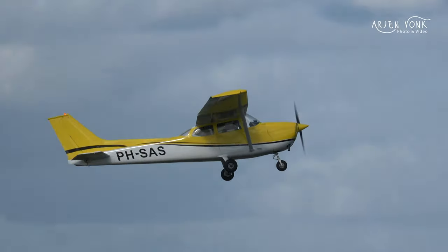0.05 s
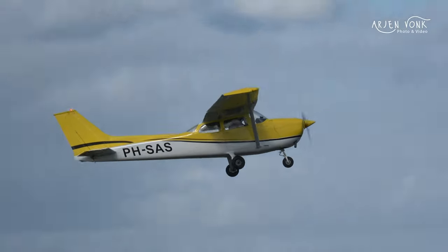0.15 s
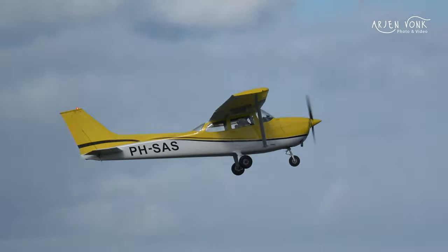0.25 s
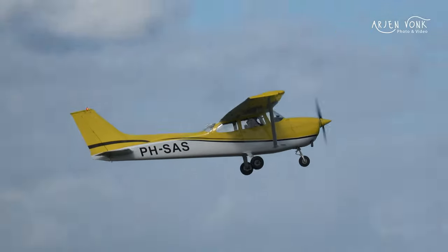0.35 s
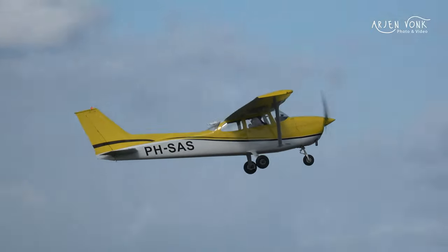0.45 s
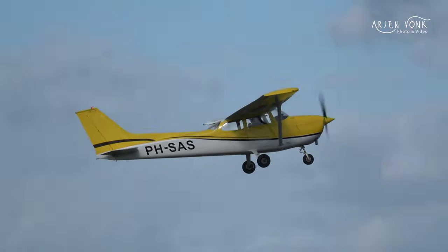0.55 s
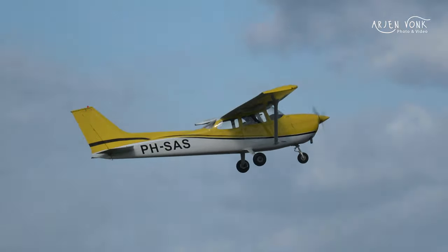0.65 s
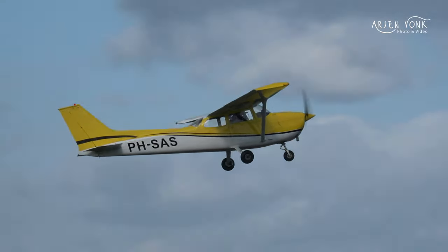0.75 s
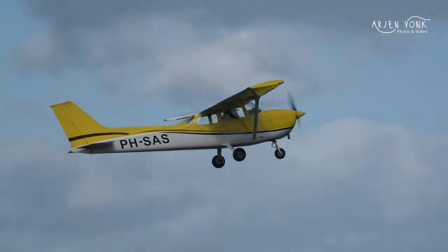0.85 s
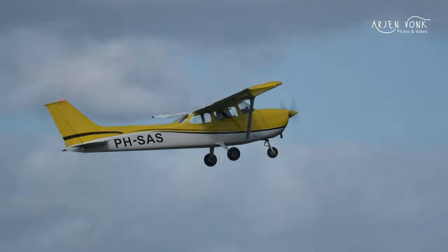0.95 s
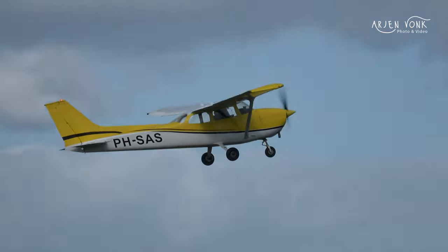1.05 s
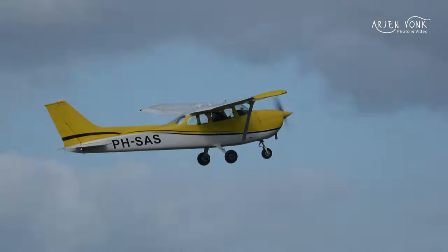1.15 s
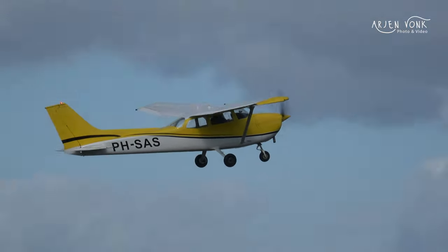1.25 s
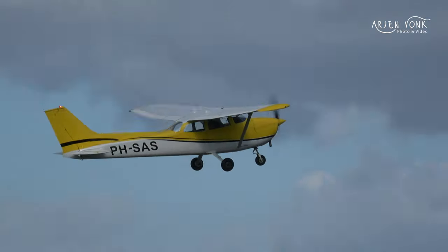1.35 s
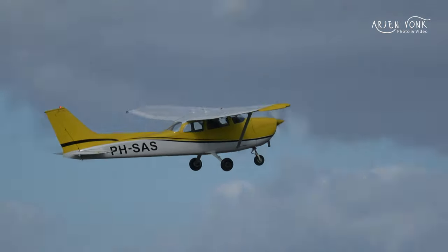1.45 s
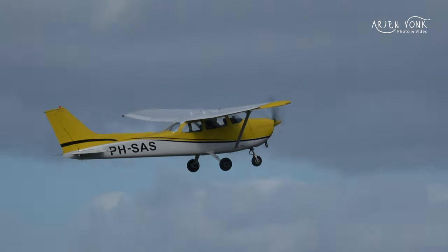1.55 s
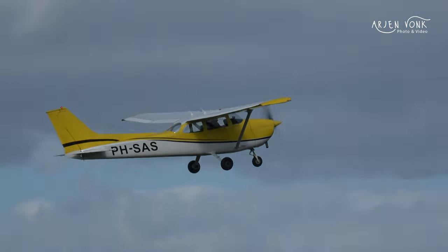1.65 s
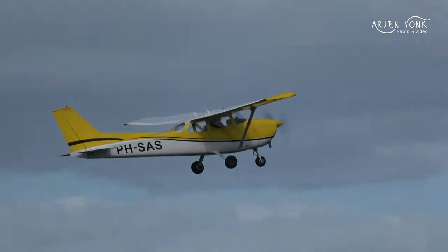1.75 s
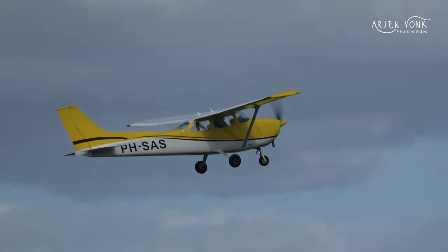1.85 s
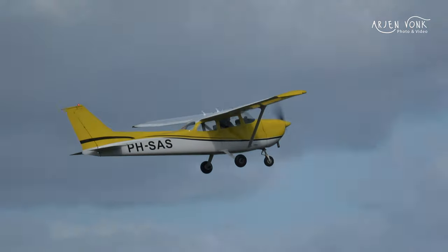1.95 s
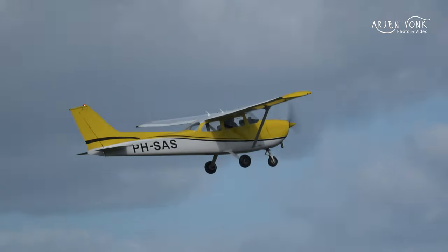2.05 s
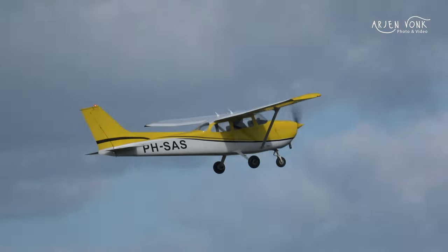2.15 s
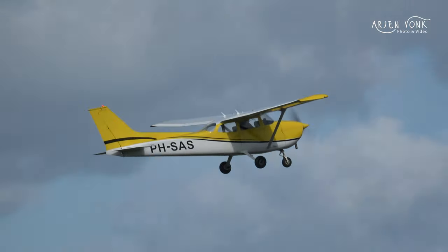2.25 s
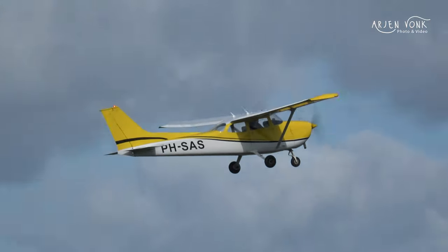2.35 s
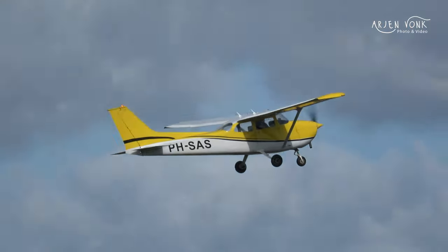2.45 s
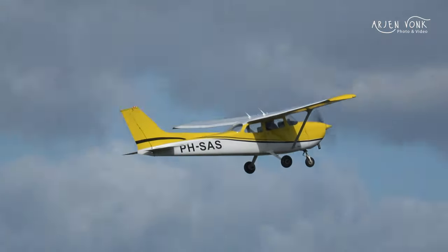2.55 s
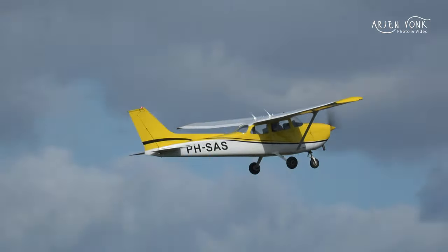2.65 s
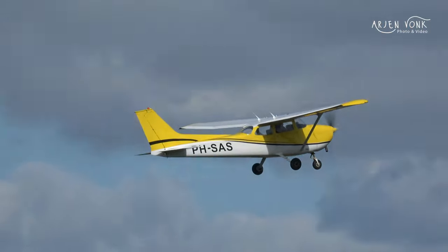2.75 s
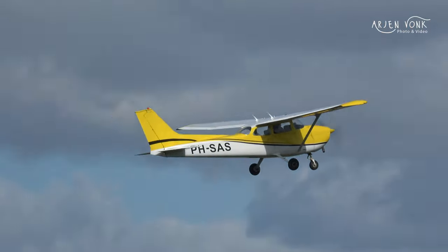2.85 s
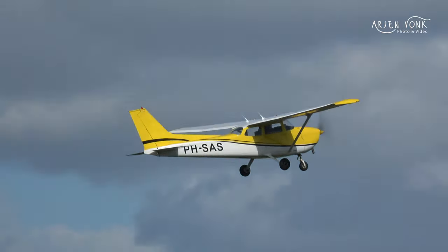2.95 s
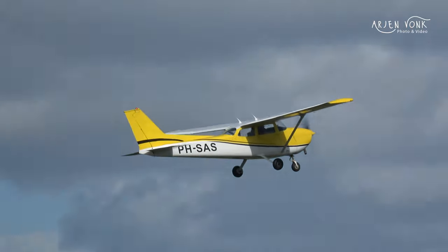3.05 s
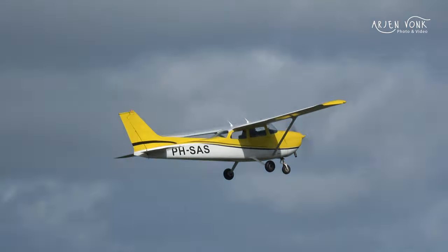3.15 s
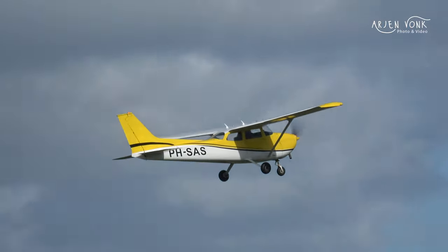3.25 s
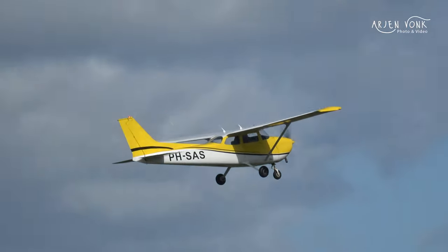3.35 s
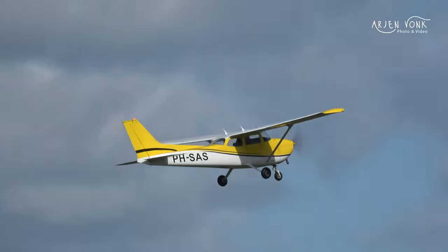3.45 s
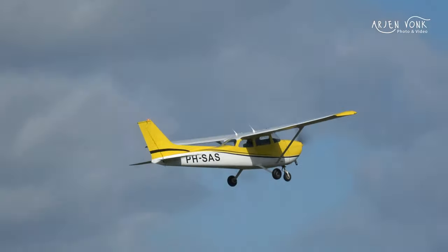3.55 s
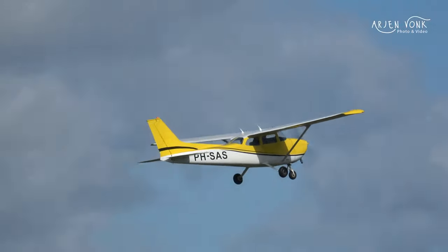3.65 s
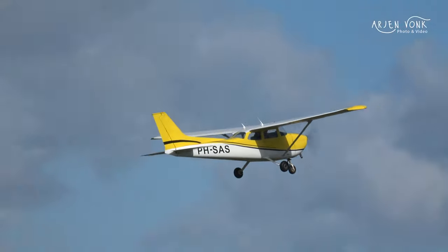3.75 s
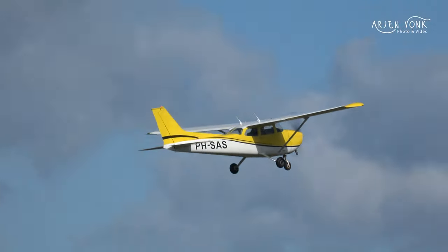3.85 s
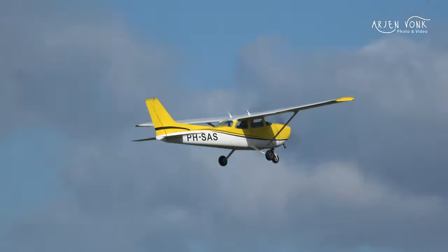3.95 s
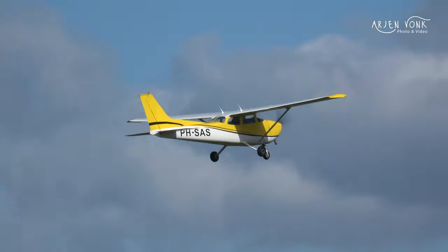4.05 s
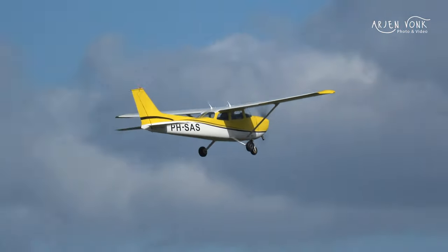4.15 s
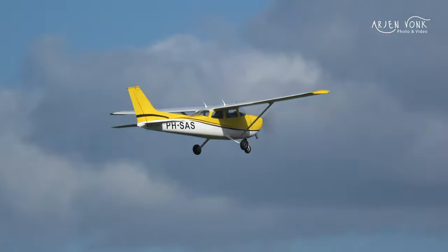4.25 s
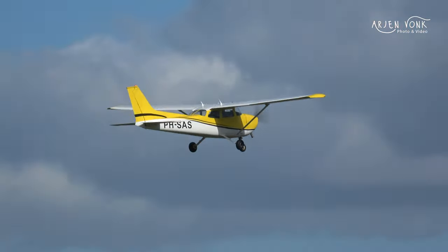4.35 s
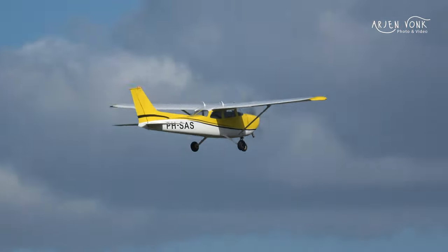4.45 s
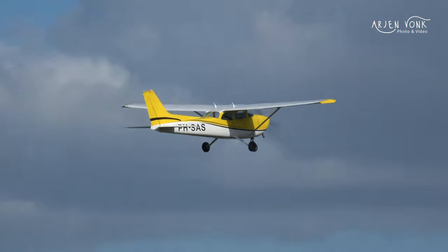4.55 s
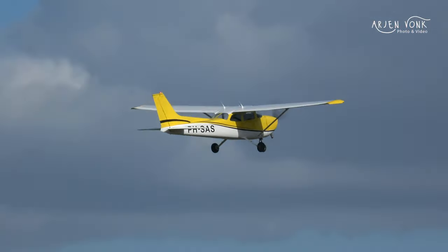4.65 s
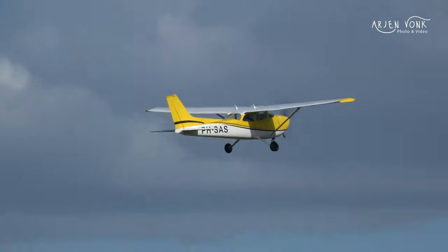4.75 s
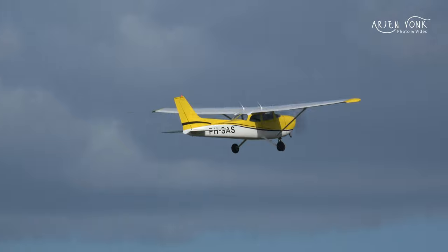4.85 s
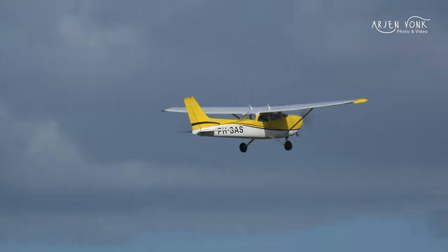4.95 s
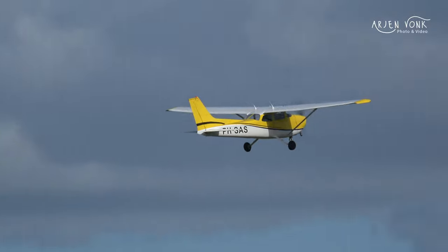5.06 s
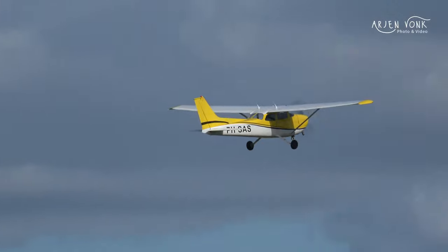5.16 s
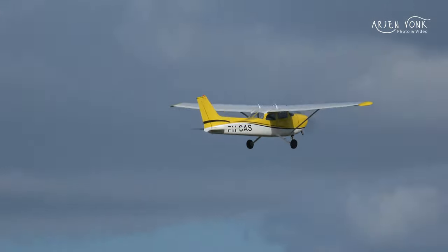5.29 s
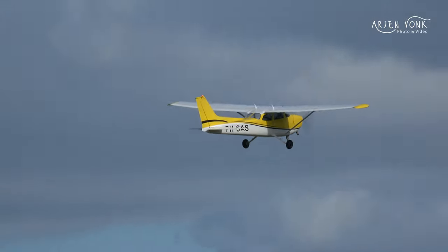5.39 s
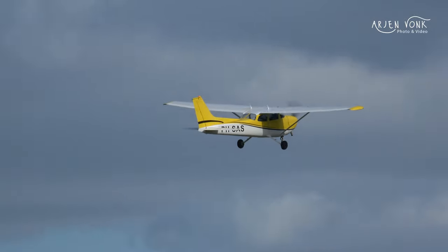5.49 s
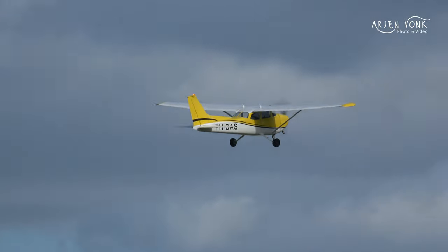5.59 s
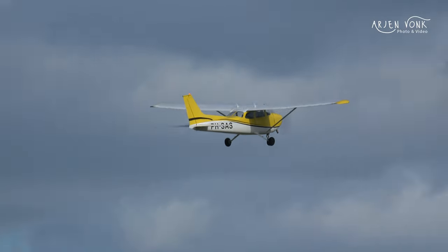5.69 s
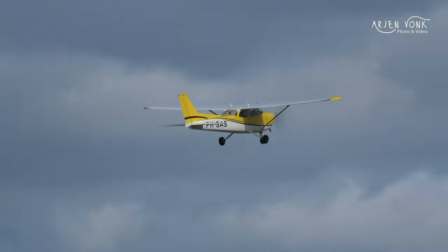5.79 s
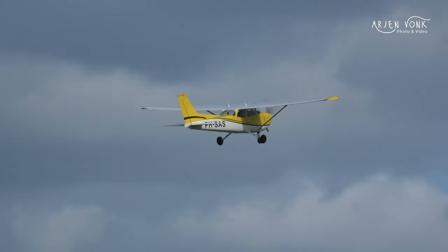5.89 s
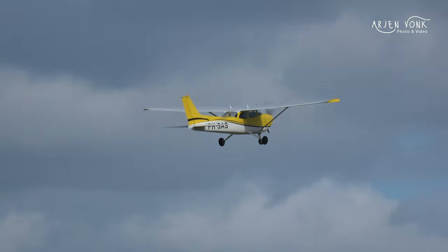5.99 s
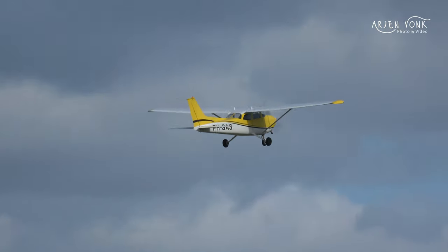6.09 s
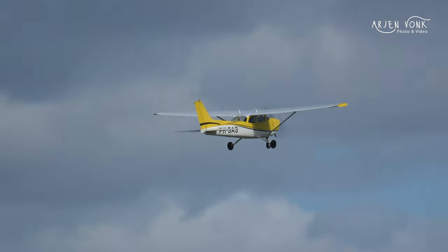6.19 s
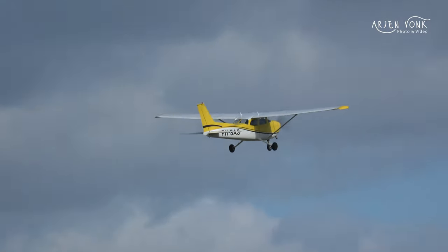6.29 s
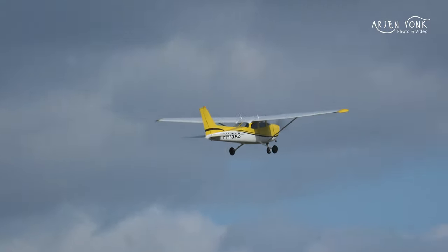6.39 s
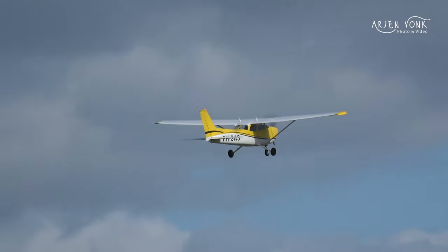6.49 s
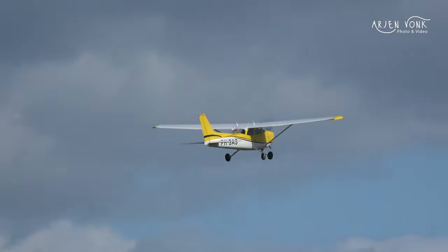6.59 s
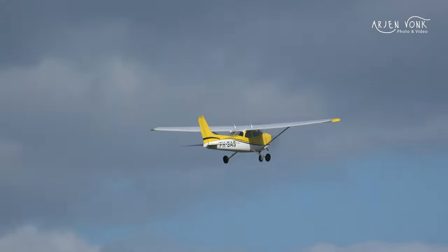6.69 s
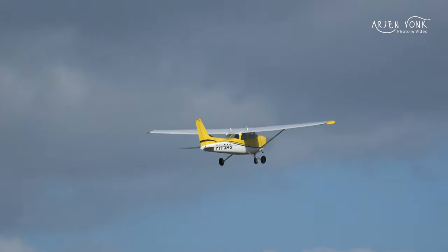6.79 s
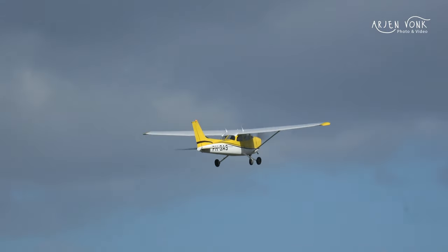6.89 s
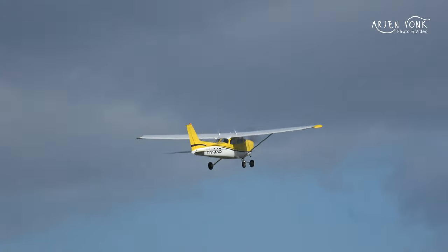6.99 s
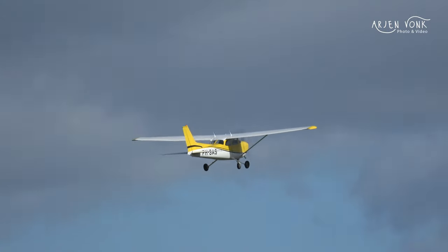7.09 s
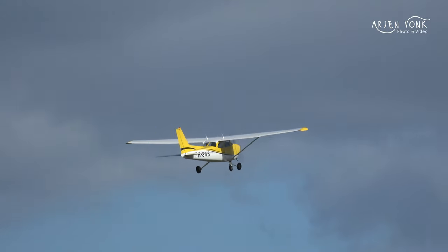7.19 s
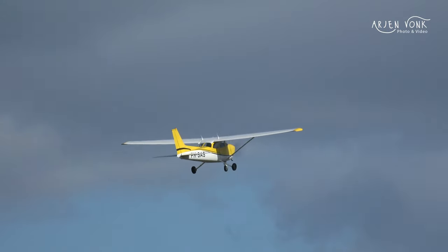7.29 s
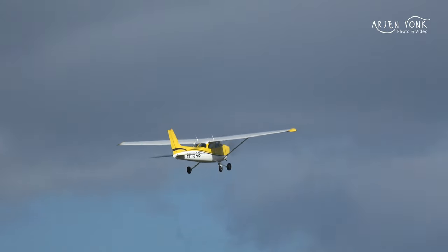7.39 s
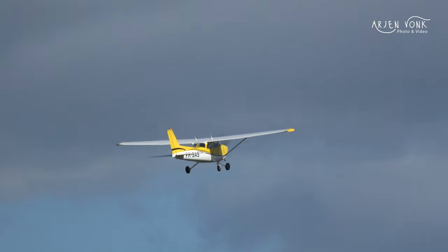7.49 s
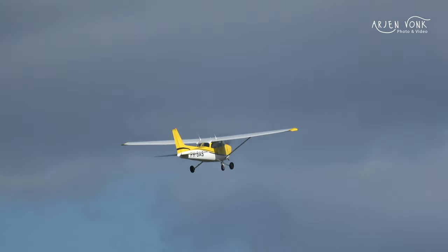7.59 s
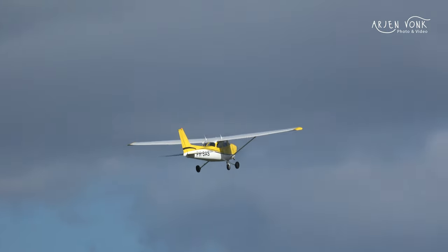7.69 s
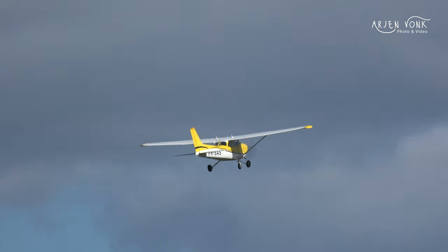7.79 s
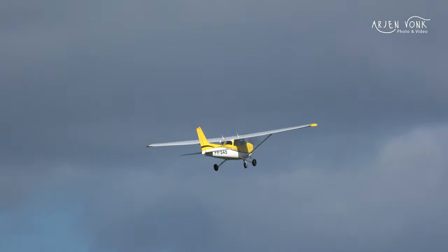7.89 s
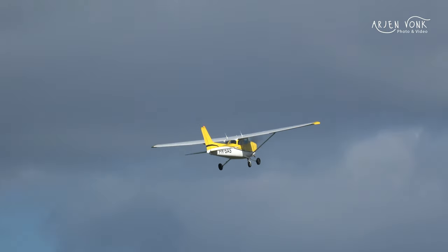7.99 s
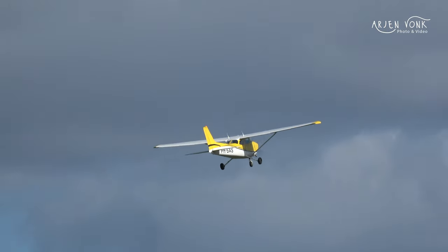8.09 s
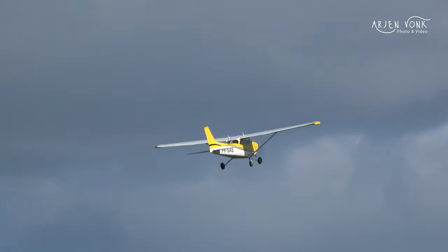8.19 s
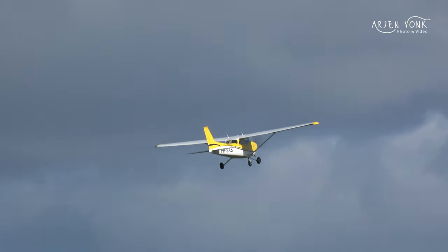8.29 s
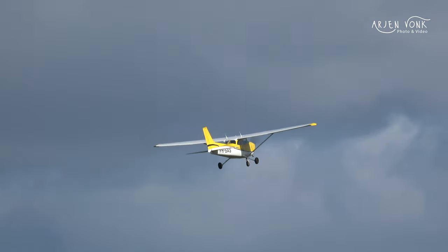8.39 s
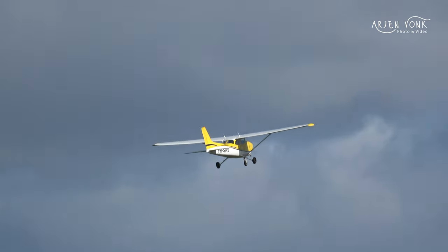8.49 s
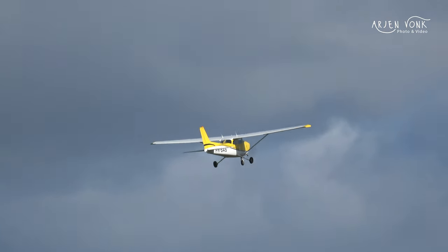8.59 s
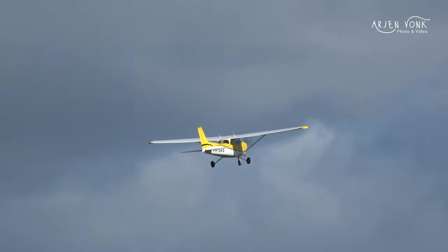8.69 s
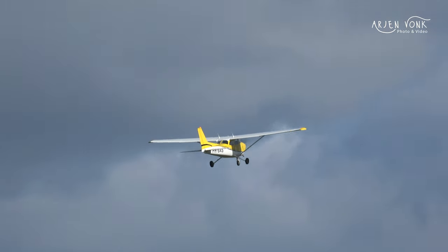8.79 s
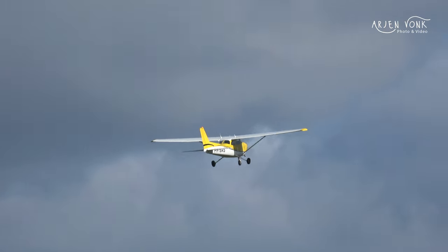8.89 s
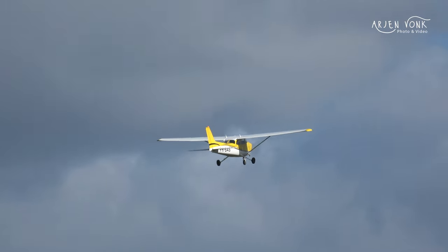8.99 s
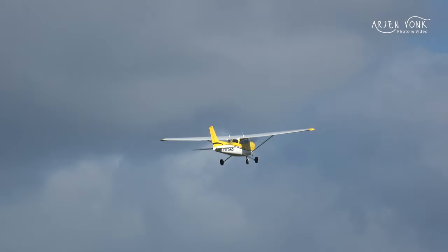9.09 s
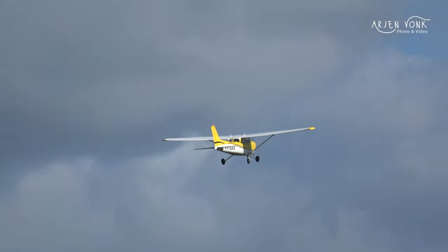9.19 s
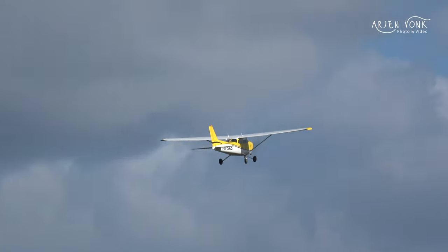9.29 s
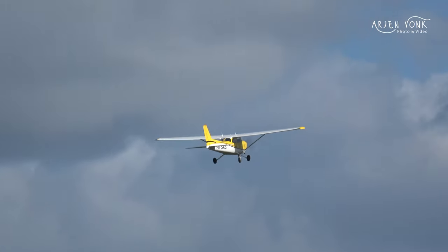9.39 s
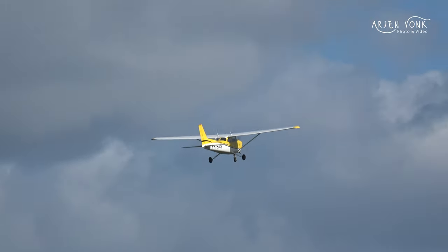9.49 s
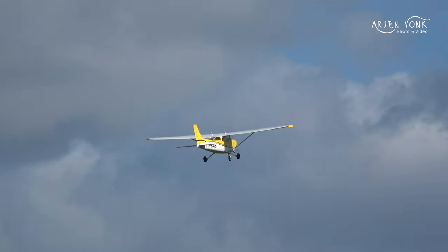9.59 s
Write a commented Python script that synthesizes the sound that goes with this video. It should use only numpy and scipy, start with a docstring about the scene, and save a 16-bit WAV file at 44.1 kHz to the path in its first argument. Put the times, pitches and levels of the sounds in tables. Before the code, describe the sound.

A small propeller plane drones past at full power with a fluttering exhaust rasp, then fades away as wind rumbles on the microphone.

```python
"""Open airfield: a light single-engine plane climbs past at full power and flies away.
Four cylinders and two propeller blades beat in step: a deep drone, plus an exhaust rasp on each firing.
The rasp flutters in turbulent air and mixes with its ground reflection.
A breeze rumbles at the microphone."""
import sys
import numpy as np
from scipy import signal
from scipy.fft import rfft, irfft, next_fast_len
from scipy.io import wavfile
from scipy.ndimage import uniform_filter1d

SR = 44100
rng = np.random.default_rng(int(sys.argv[2]) if len(sys.argv) > 2 else 0)


def dump(signal):
    """Clip the signal to [-1, 1] and save it as 16-bit WAV at the path in sys.argv[1]."""
    limited = np.clip(np.atleast_2d(signal).T, -1, 1)
    pcm = np.round(limited * 32767).astype(np.int16)
    wavfile.write(sys.argv[1], SR, pcm)


N = 425124
TIME_S = np.arange(N) / SR

# Firing rate as heard, lowered by Doppler shift: (time [s], rate [Hz])
FIRING_RATE_HZ = [(0, 83.0), (1.0, 81.26), (1.8, 79.9), (2.6, 79.2), (3.8, 77.58), (5.0, 76.55),
                  (7.0, 76.95), (8.2, 76.7), (9.64, 75.7)]
# Flight path: (time [s], view [0 side, 1 astern, 2 far])
FLIGHT_VIEW = [(0, 0), (4.5, 0.16), (5.3, 0.17), (6.3, 0.69), (7.6, 1.51), (8.15, 1.8), (9.2, 2),
               (9.64, 1.8)]
# Drone base levels: (time [s], fundamental [dB], octave [dB], overtones [dB])
DRONE_DB = [(0.05, -14, -32, -28.5), (0.48, -14, -25, -27.5), (1.78, -17, -22.5, -31),
            (2.21, -17.5, -28, -38.5), (2.29, -19, -34, -36), (2.59, -17.5, -27, -27.5),
            (2.83, -15.5, -25, -33.5), (3.79, -17, -32.5, -35.5), (4.16, -22.5, -30.5, -35.5),
            (4.88, -23.5, -44.5, -33.5), (5.15, -25, -40, -41.5), (6.35, -29.5, -47, -40),
            (7.18, -30.5, -41.5, -40), (7.93, -31, -48, -37.5), (8.33, -33, -38.5, -41.5),
            (8.76, -32.5, -48, -37), (9.51, -31, -46.5, -45), (9.64, -44, -50, -41)]
# Overtone gains by view: (multiple of firing rate [-], side [dB], astern [dB], far [dB])
OVERTONE_DB = [(3, -7.5, -5, -4.5), (4, -2, -9.5, -7.5), (5, -3.5, -4.5, -2), (6, 0, -29.5, -15.5),
               (7, -4.5, -2, -9), (8, -7.5, -9, -13)]
# Cylinder strengths in firing order: (gain [dB])
CYLINDER_GAIN_DB = [2.5, -1, -1, -1.5]
# Rasp spectra by view; pipe resonances near 630, 1280, 1950 Hz: (frequency [Hz], gain [dB])
SIDE_SPECTRUM_DB = [(200, -14), (330, -9), (460, -6.5), (640, 0), (890, -7), (1280, -8.5), (1570, -14),
                    (1970, -11), (2390, -16), (3400, -15.5), (3650, -16.5), (4000, -22), (10000, -31.5)]
ASTERN_SPECTRUM_DB = [(200, -14), (330, -4.5), (475, -18), (605, 7.5), (720, -2), (820, 1.5), (930, -4.5),
                      (1210, -11), (1350, -7.5), (1570, -16), (1900, -7.5), (2140, -16.5), (2790, -19),
                      (3650, -21), (4000, -30), (10000, -47.5)]
FAR_SPECTRUM_DB = [(200, -8), (380, -2.5), (590, -1), (720, -6.5), (900, 1), (1260, -9), (1340, -7.5),
                   (1640, -16), (1870, -12), (2660, -31.5), (3690, -35), (4000, -41), (10000, -44.5)]
# Rasp base levels, sinking with distance: (time [s], bark [dB], snarl [dB], crackle [dB])
RASP_DB = [(0.0, -29.0, -32, -39), (0.12, -26, -29, -35), (1.9, -23.5, -32.0, -37.0),
           (2.25, -29.5, -40.0, -43.0), (2.7, -25.5, -36, -40.0), (4.7, -28.0, -41, -41.5),
           (5.1, -37, -40.0, -45.0), (6.5, -39, -45.0, -51), (7.5, -32.5, -44.0, -48.5),
           (8.15, -40.5, -46, -53.5), (9.64, -38.0, -49, -58.0)]
# Sizzle relative to crackle, peaking at the pass: (time [s], gain [dB])
SIZZLE_DB = [(0, -10), (2.0, -6), (2.85, -6), (3.04, -1), (3.3, -7), (4.3, -8.5), (6.0, -11), (9.64, -16)]
# Air-borne swells and fades of the rasp: (centre [s], length [s], bark [dB], snarl [dB], crackle [dB])
RASP_SWELLS_DB = [(0.32, 0.15, 2.5, 5.5, 1.5), (0.86, 0.31, 3, 7.0, 4.5), (1.05, 0.32, -4, -5.5, -4),
                  (1.33, 0.31, -4, -1, -9.5), (1.5, 0.083, 2, 10, 7.5), (1.73, 0.24, 0, 1.5, 2),
                  (2.08, 0.2, 3, 3.5, 6), (2.45, 0.2, 2.5, 8.5, 5.5), (2.94, 0.33, 3.5, 10, 4.5),
                  (3.17, 0.17, -0.5, -5.5, -6), (3.41, 0.4, 1.5, 6.0, 2.5), (3.68, 0.57, 0.5, 5.5, 2.5),
                  (3.9, 0.3, -4, 1, -1), (4.1, 0.39, -2.5, 8, 5), (4.6, 0.49, 2.5, 9.5, 3),
                  (5.54, 0.43, 2.5, 2.0, 5), (5.7, 0.15, -4, -3.5, -5), (5.97, 1, 6.5, 4, 4),
                  (6.37, 0.14, 4.5, -9, 2), (6.95, 0.67, 4.5, 6, -1.5), (7.72, 0.54, 0.5, 7.0, 1.5),
                  (8.39, 0.47, 0.5, 5, 0.0), (8.83, 0.55, 5.5, 0.5, 3)]
# Single-firing accents, mostly louder: (time [s], gain [dB])
FIRING_ACCENTS_DB = [(.14, 6), (.333, -4), (1.464, 1), (2.566, 0.5), (2.669, 2), (2.922, 1.5), (3.176, 3),
                     (3.33, -2), (3.484, -0.5), (3.688, 3.5), (4.36, 2), (4.464, 2.5), (4.516, 5),
                     (4.621, 4), (4.881, 10.5)]
# Ground reflection, later as the plane climbs: (time [s], lag [ms], gain [-])
GROUND_BOUNCE = [(0, 1.37, 0.44), (.4, 1.34, 0.38), (.8, 1.54, 0.22), (1.5, 1.6, 0.23), (2.0, 2.08, 0.41),
                 (2.6, 2.02, 0.12), (4.2, 2.4, 0.053), (6.0, 3.89, 0.38), (7.0, 3.69, 0.21),
                 (8.3, 3.26, 0.18), (9.64, 3.8, 0.11)]
# Breeze base level: (time [s], level [dB])
BREEZE_DB = [(0, -49), (.7, -48.5), (1.8, -39.5), (3.2, -38.5), (3.8, -44), (4.4, -43.5), (5.3, -38),
             (9.64, -39.5)]
# Gusts: (crest [s], length [s], gain [dB])
GUSTS_DB = [(2.16, .4, 5), (4.9, 0.94, 4.5), (7.6, 0.23, 5.5), (7.98, 0.43, 3.5), (9.45, 0.61, 3)]
# Wind rumble spectrum: (frequency [Hz], gain [dB])
WIND_SPECTRUM_DB = [(10, -24), (22, -8.5), (35, -4), (65, 0), (100, -2.5), (150, -10), (300, -14.5),
                    (700, -35), (2000, -48), (6000, -70)]
# Microphone treble loss: (frequency [Hz], gain [dB])
MIC_RESPONSE_DB = [(3900, -1), (4250, -7), (4550, -16.5), (4850, -16.5), (5300, -11), (6200, -13.5),
                   (8000, -22), (11000, -38), (16000, -49.5)]


def drone(firings, view_weights, waver_db=1.0, far_waver_db=2.0, wander_cycles=0.028):
    """Blade passes and exhaust pulses sum to a sawtooth-like wave that wavers more with distance."""
    fundamental_db, octave_db, upper_db = envelopes(DRONE_DB)
    octave_trim_db, upper_trim_db = 0.5, -1.5
    phase_rad = 2 * np.pi * firings
    fading_db = far_waver_db * (1 - view_weights[0])
    wave = from_db(fundamental_db + fading_db * drift(21)) * np.sin(phase_rad)
    wave += from_db(octave_db + octave_trim_db + fading_db * drift(9.3)) * np.sin(2 * phase_rad)
    for multiple, *view_db in OVERTONE_DB:
        level_db = upper_db + upper_trim_db + np.array(view_db) @ view_weights + waver_db * drift(4.1)
        wander_rad = 2 * np.pi * wander_cycles * drift(4.1)
        wave += from_db(level_db) * np.sin(round(multiple) * (phase_rad + wander_rad))
    return np.sqrt(2) * wave


def exhaust_rasp(firings, view_weights, far_blur=0.2, trims_db=(0.2, 0.3, 0.4, -0.5)):
    """Exhaust puffs: a lopsided bark in the pipe's lowest resonance, gritty snarl and crackle above."""
    crispness = 1 - far_blur * view_weights[2]
    bark = puffs(firings, depth_db=4.1 * crispness, scatter_db=1.6, imbalance=0.86,
                 lead_cycles=0.097, grit_db=0.6, repeat_db=-1.0)
    grit = puffs(firings, depth_db=5.5 * crispness, scatter_db=0.95, imbalance=0.15,
                 lead_cycles=0.0, grit_db=1.5, repeat_db=-9.0)
    source = grit + low_pass(bark - grit, cutoff_hz=950)   # crossover: bark below, grit above
    spectra = [SIDE_SPECTRUM_DB, ASTERN_SPECTRUM_DB, FAR_SPECTRUM_DB]
    radiated = sum(weight * shaped(source, spectrum) for weight, spectrum in zip(view_weights, spectra))
    arriving = turbulence(ground_reflection(radiated))
    bands = split(arriving, edges_hz=[1100, 2300, 4600])
    return sum(band / running_rms(band) * from_db(level_db + trim_db)
               for band, level_db, trim_db in zip(bands, rasp_levels_db(), trims_db))


def puffs(firings, depth_db, scatter_db, imbalance, lead_cycles, grit_db, repeat_db, skew_rad=0.43):
    """Gas leaving the pipe: one quick-rising puff per firing, strength set by cylinder and chance."""
    index = np.round(firings + lead_cycles).astype(int)
    cylinder_db = np.array(CYLINDER_GAIN_DB)[index % len(CYLINDER_GAIN_DB)]
    strength_db = imbalance * cylinder_db + scatter_db * rng.standard_normal(1000)[index]
    phase_rad = 2 * np.pi * (firings + lead_cycles)
    pulse = np.cos(phase_rad + skew_rad * (1 + np.cos(phase_rad)))
    jet = unit_rms(rng.standard_normal(N) * from_db(grit_db * drift(320)))
    gas = jet + from_db(repeat_db) * repeating_flow(firings)
    return unit_rms(gas * from_db(depth_db * pulse + strength_db * np.sqrt((1 + pulse) / 2)))


def repeating_flow(firings, points=2048):
    """Exhaust flow that recurs every four-stroke cycle, changing slowly."""
    position = firings / len(CYLINDER_GAIN_DB) % 1 * points
    shapes = rng.standard_normal((4, points))
    return unit_rms(sum(drift(1.67) * np.interp(position, np.arange(points), shape) for shape in shapes))


def rasp_levels_db(waver_db=1.5, accent_s=0.029, treble_share=0.38):
    """Bark, snarl, crackle and sizzle levels: slow decline, swells, accents, slight waver."""
    bark_db, snarl_db, crackle_db = envelopes(RASP_DB) + swells_db(RASP_SWELLS_DB)
    sizzle_db, = envelopes(SIZZLE_DB)
    accent_db, = swells_db([(time_s, accent_s, db) for time_s, db in FIRING_ACCENTS_DB])
    treble_db = [db + treble_share * accent_db for db in (snarl_db, crackle_db, crackle_db + sizzle_db)]
    return [db + waver_db * drift(7.5) for db in [bark_db + accent_db, *treble_db]]


def ground_reflection(x):
    """A weaker, later copy off the airfield: a comb whose teeth slide down."""
    lag_ms, gain = envelopes(GROUND_BOUNCE)
    return x + gain * delayed(x, lag_ms)


def turbulence(x, scatter=0.14, max_lag_ms=2.92, flutter_db=0.87, flicker_db=1.97, count=8):
    """Eddies scatter treble along longer paths: peaks and dips come and go; each band also flickers."""
    treble = x - low_pass(x, cutoff_hz=700)
    for lag_ms in np.linspace(max_lag_ms / count, max_lag_ms, count):
        x = x + scatter * drift(3.14) * delayed(treble, lag_ms)
    bands = split(x, edges_hz=np.geomspace(500, 4500, count))
    return sum(band * from_db(flutter_db * drift(11) + flicker_db * drift(20)) for band in bands)


def breeze(waver_db=1.0, trim_db=6.5):
    """Air moving past the microphone: lumpy low rumble with a few gusts."""
    base_db, = envelopes(BREEZE_DB)
    gust_db, = swells_db(GUSTS_DB)
    gain = from_db(base_db + gust_db + trim_db + waver_db * drift(8.9))
    return gain * unit_rms(shaped(rng.standard_normal(N), WIND_SPECTRUM_DB))


def from_db(db):
    return 10 ** (np.asarray(db) / 20)


def unit_rms(x):
    return x / np.sqrt(np.mean(x ** 2) + 1e-20)


def running_rms(x, window_samples=3500):
    """RMS over about six firings."""
    return np.sqrt(uniform_filter1d(x ** 2, window_samples) + 1e-12)


def envelopes(rows):
    """One per-sample curve for each value column."""
    times_s, *columns = np.transpose(rows)
    return [np.interp(TIME_S, times_s, column) for column in columns]


def swells_db(rows):
    """Summed raised-cosine bumps, one curve per gain column."""
    curves_db = np.zeros((len(rows[0]) - 2, N))
    for centre_s, length_s, *gains_db in rows:
        span = slice(*np.searchsorted(TIME_S, [centre_s - length_s / 2, centre_s + length_s / 2]))
        bump = np.cos(np.pi * (TIME_S[span] - centre_s) / length_s) ** 2
        curves_db[:, span] += np.outer(gains_db, bump)
    return curves_db


def drift(corner_hz, hop_samples=100):
    """Low-passed random wander, RMS about 1."""
    pole = np.exp(-2 * np.pi * corner_hz * hop_samples / SR)
    noise = rng.standard_normal(N // hop_samples + 1002)
    slow = signal.lfilter([1], [1, -2 * pole, pole * pole], noise)[1000:]   # skip settling
    return np.interp(np.arange(N) / hop_samples, np.arange(len(slow)), unit_rms(slow))


def delayed(x, lag_ms):
    return np.interp(TIME_S - lag_ms / 1000, TIME_S, x)


def shaped(x, spectrum):
    """Filter by a (frequency [Hz], gain [dB]) table."""
    hz, db = np.transpose(spectrum)
    size = next_fast_len(N, True)
    bins_hz = np.maximum(np.arange(size // 2 + 1) * SR / size, 1)
    gain = from_db(np.interp(np.log(bins_hz), np.log(hz), db))
    return irfft(rfft(x, size) * gain, size)[:N]


def low_pass(x, cutoff_hz):
    """Zero phase, so adjoining bands sum back."""
    return signal.sosfiltfilt(signal.butter(6, cutoff_hz, fs=SR, output="sos"), x)


def split(x, edges_hz):
    """Adjoining bands, low to high."""
    return np.diff([0 * x, *[low_pass(x, hz) for hz in edges_hz], x], axis=0)


def scene():
    """Plane and breeze, mono."""
    firing_hz, = envelopes(FIRING_RATE_HZ)
    firings = 1 / 4 + np.cumsum(firing_hz) / SR   # running count
    view, = envelopes(FLIGHT_VIEW)
    view_weights = np.maximum(1 - np.abs(view - np.arange(3)[:, None]), 0)   # side, astern, far
    return (drone(firings, view_weights) + exhaust_rasp(firings, view_weights) + breeze())[None]


def record(dry):
    """Dull microphone, faint hiss, steep top cut."""
    hiss_db, cutoff_hz = -77.5, 15700
    sound = shaped(dry[0], MIC_RESPONSE_DB) + from_db(hiss_db) * rng.standard_normal(N)
    top_cut = signal.ellip(10, 0.1, 80, cutoff_hz, fs=SR, output="sos")
    return signal.sosfilt(top_cut, sound)[None]


dry = scene()
out = record(dry)
dump(out)
```